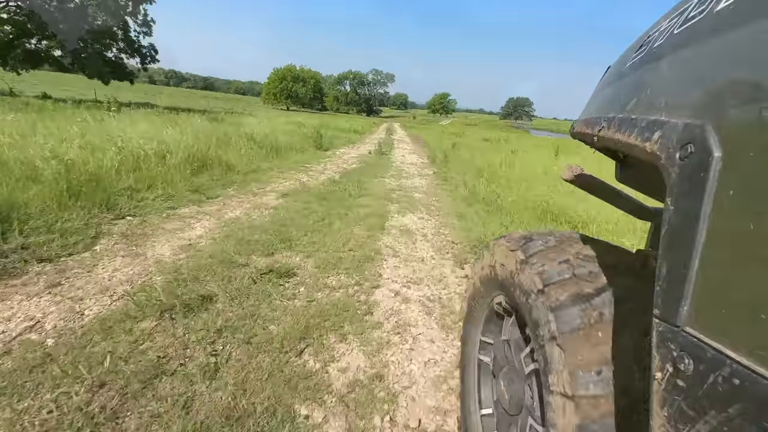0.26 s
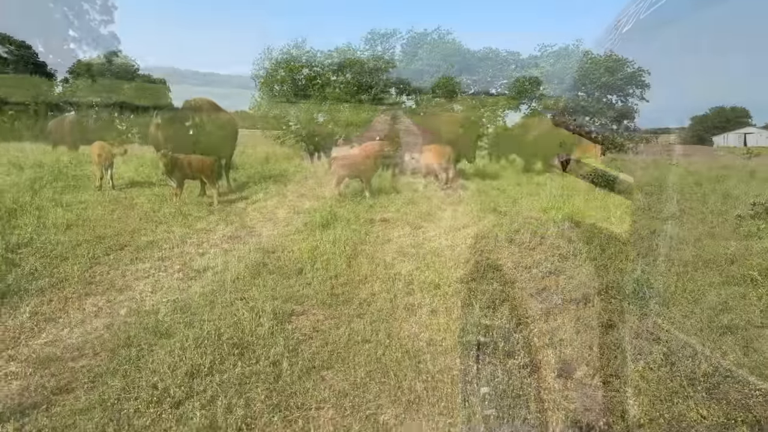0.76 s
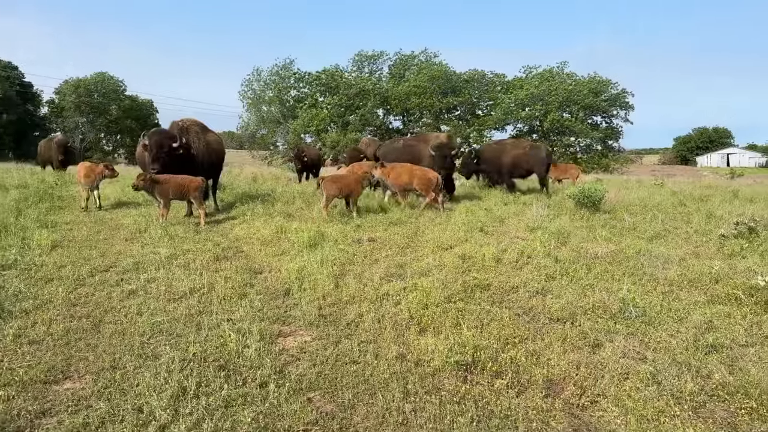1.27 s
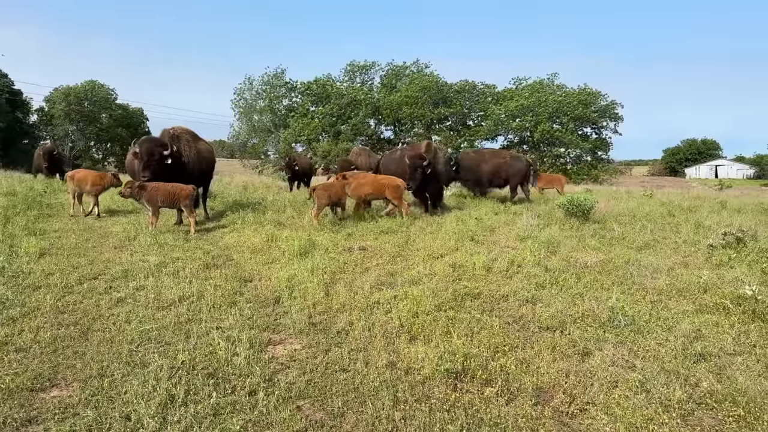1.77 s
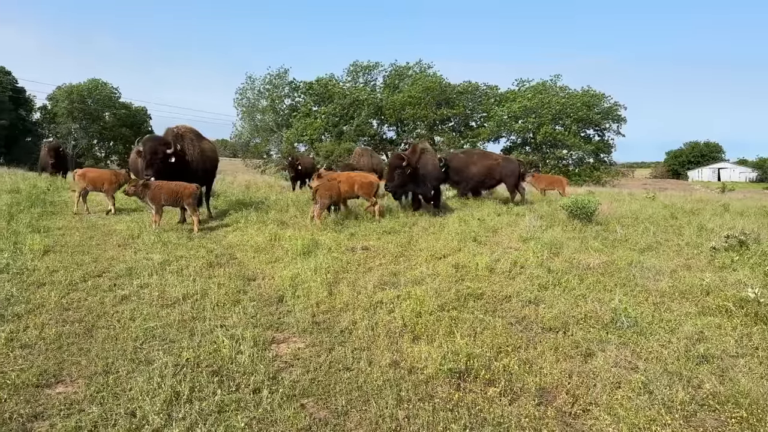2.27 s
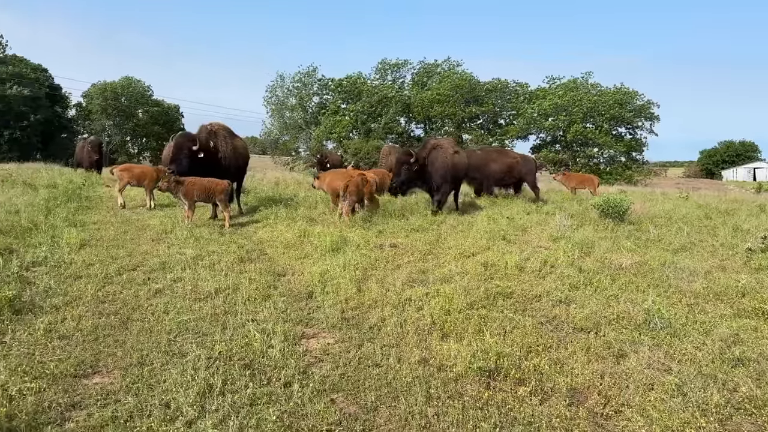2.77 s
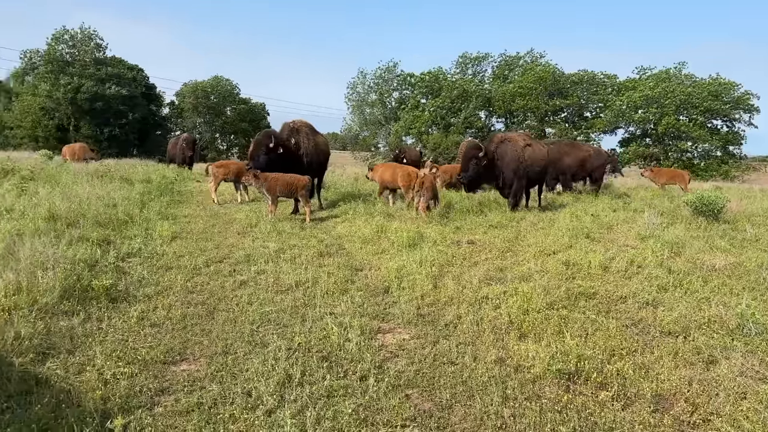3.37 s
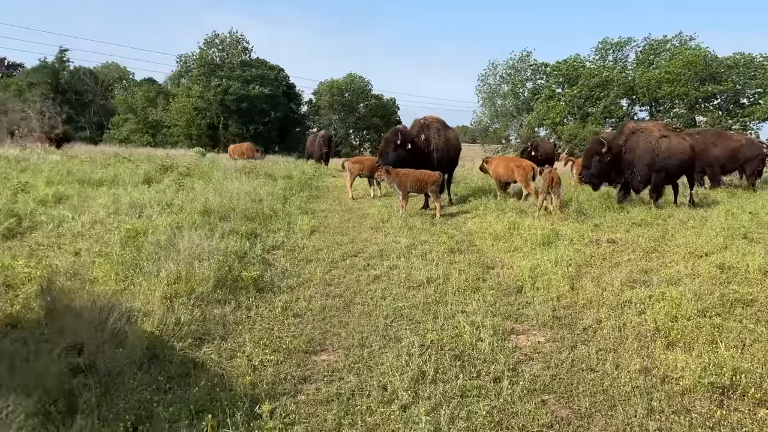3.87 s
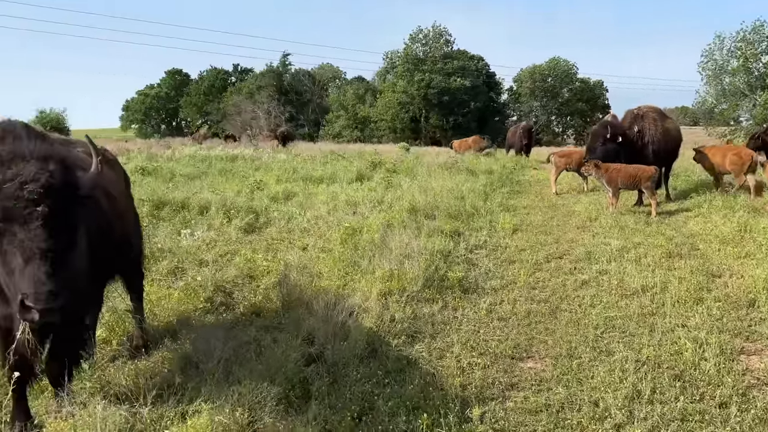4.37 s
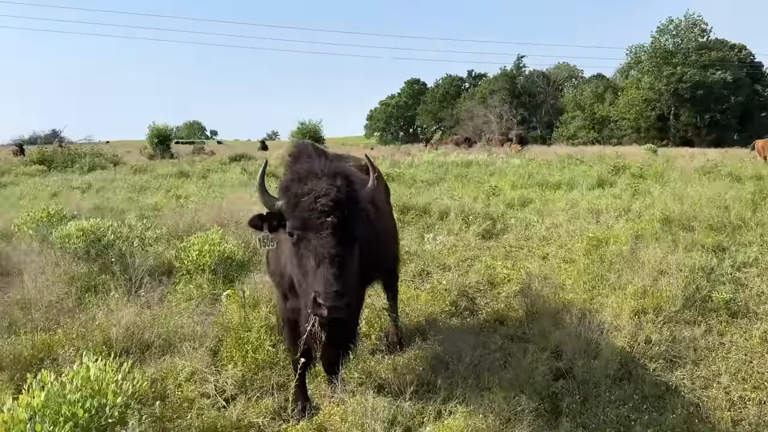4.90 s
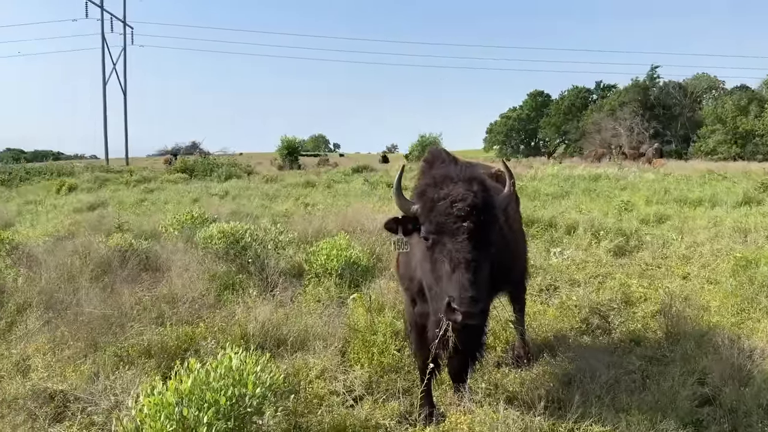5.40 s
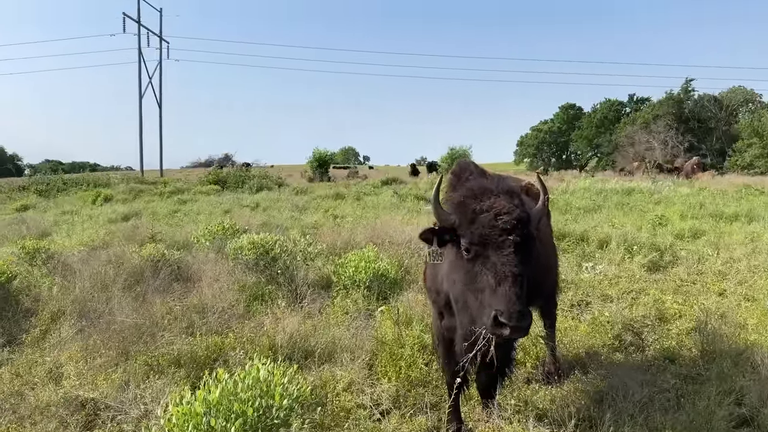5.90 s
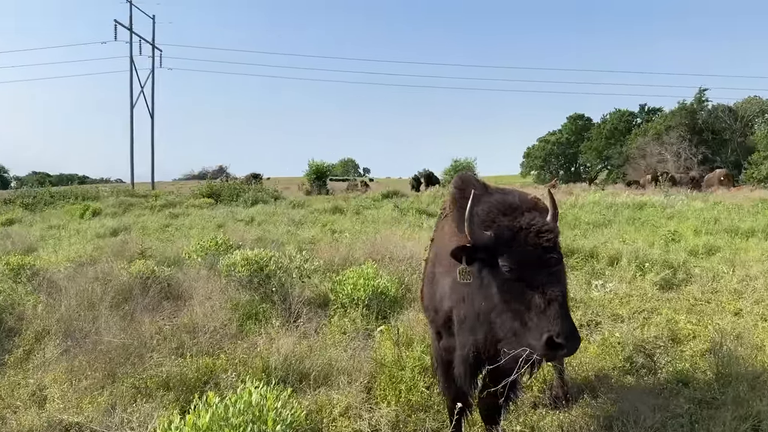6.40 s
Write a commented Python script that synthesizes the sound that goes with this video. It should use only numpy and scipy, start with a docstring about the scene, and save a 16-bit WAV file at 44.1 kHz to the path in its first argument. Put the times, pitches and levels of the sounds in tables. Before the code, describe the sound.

Engine hum, tyre noise and short high squeaks from an off-road vehicle open the scene and die away within about a second. In the calm open field that follows, bison grunt nearby in deep, rattling bursts while grass rustles and tears softly. Uneven wind buffets the microphone over faint crickets. Toward the end a far bird sings gliding notes and one last soft, breathy grunt sounds.

```python
"""A small off-road vehicle rolls along a dirt track: the engine drones, the tyres roar and rubber in
the suspension squeaks. After about a second it has faded, leaving a quiet pasture. Large grazing
animals grunt as their slack vocal folds slap shut, and they tear grass with a crackle. Wind buffets
the microphones and crickets trill with their wings. Mostly near the end, a distant bird whistles."""
import sys
import numpy as np
from scipy import signal
from scipy.fft import next_fast_len
from scipy.io import wavfile
from scipy.ndimage import uniform_filter1d

SR = 44100
rng = np.random.default_rng(int(sys.argv[2]) if len(sys.argv) > 2 else 0)


def pcm_store(signal):
    """Save signal as 16-bit PCM."""
    levels = np.round(np.clip(np.atleast_2d(signal), -1, 1) * 32767)
    wavfile.write(sys.argv[1], SR, levels.astype(np.int16).T)


N = 293265

# spectrum of wind on the microphones: f/Hz, level/dB
WIND_SPECTRUM = [(12, -45), (20, -26), (43, -1.5), (66, 2.5), (168, -13), (248, -20), (284, -33),
                 (500, -34), (650, -19), (1100, -120)]
# how alike left and right are in the open air: f/Hz, likeness (1 same, -1 opposite)
AIR_LIKENESS = [(60, 0.94), (180, 0.88), (550, -0.34), (1650, -0.088), (4970, -0.29), (15000, -0.5)]


def amp(db):
    """Turn decibels into a gain."""
    return 10 ** (np.asarray(db) / 20)


def rms_one(x):
    """Scale a signal to an average (rms) strength of 1."""
    return x / np.sqrt(np.mean(x ** 2) + 1e-20)


def at_hz(points, hz):
    """Read a curve at one frequency, on an axis of octaves."""
    freqs, values = np.transpose(points)
    return np.interp(np.log(hz), np.log(freqs), values)


def three_points(times, values):
    """An event's own clock, and a line through its values at start, turn and end."""
    t = np.arange(0, times[2] - times[0], 1 / SR)
    return t, np.interp(t + times[0], times, values)


def drift(rate, size=N):
    """A random wander of about 1 either way; a higher rate (Hz) wanders faster."""
    r = np.exp(-80 * np.pi * rate / SR)
    slow = signal.lfilter([1], [1, -2 * r, r * r], rng.standard_normal(N // 40 + 2002))[2000:]
    return np.interp(np.arange(size) / 40, np.arange(len(slow)), rms_one(slow))


def resonate(x, hz, width):
    """Let a signal ring at one frequency; a narrower width (Hz) rings longer."""
    r = np.exp(-np.pi * width / SR)
    feedback = [1, -2 * r * np.cos(2 * np.pi * hz / SR), r * r]
    return signal.lfilter(np.array([1, 0, -1]) * (1 - r * r) / 2, feedback, x)


def ring(x, hz, width):
    """Resonate twice for a steeper peak."""
    return resonate(resonate(x, hz, width), hz, width)


def body(x, modes):
    """A hollow body rings at several resonances (modes), added with alternating signs."""
    return sum((-1) ** k * amp(db) * ring(x, hz, width) for k, (hz, width, db) in enumerate(modes))


def pan(db):
    """Left and right gains; positive dB leans left."""
    return amp(np.array([[.5], [-.5]]) * db)


def add(out, start_s, x, pan_db=0):
    """Mix a mono sound into the stereo track."""
    start = round(start_s * SR)
    x = x[:N - start]
    out[:, start:start + len(x)] += x * pan(pan_db)


def banded_noise(spectrum, likeness, flicker_db, rate, balance=((1, 0), (2, 0)), size=N):
    """Stereo noise of strength 1, built from half-octave bands that flicker in level."""
    out, together = 0, drift(rate / 4, size)
    edges = np.r_[20 * 2 ** np.arange(0, 9.5, .5), 12200, 16500]
    white = rng.standard_normal((2, 2, size))
    for k, (low, high) in enumerate(zip(edges, edges[1:])):
        hz = np.sqrt(low * high)
        if at_hz(spectrum, hz) < -70:
            continue
        band = signal.butter(2, [low, high], "band", fs=SR, output="sos")
        mid, side = signal.sosfilt(band, white[k % 2])
        alike = np.clip(at_hz(likeness, hz), -1, 1)
        stereo = np.sqrt(1 + alike) * mid + np.sqrt(1 - alike) * side * [[1], [-1]]
        gain = amp(at_hz(spectrum, hz) + flicker_db * (0.45 * together + drift(rate, size)))
        out = out + gain * pan(at_hz(balance, hz)) * stereo
    return rms_one(out)


def pasture_air():
    """Far traffic, leaves and air blend into a faint wash."""
    # spectrum of the wash: f/Hz, level/dB
    spectrum = [(88, -30), (150, -7), (263, 2.5), (396, -0.5), (681, 1), (894, 2), (1870, -15), (2700, -5),
                (3410, -29), (5230, -13.5), (5870, -23), (9360, -23), (15500, -118.5)]
    return amp(-57.5) * banded_noise(spectrum, AIR_LIKENESS, flicker_db=1.3, rate=9.3)


def crickets():
    """Fast strokes ring a cricket's wing in trills, blurred by the grass; many more sing far off."""
    # trills: start t/s, level/dB
    trills = [(1.1, -79), (1.5, -68.5), (2.028, -66.5), (2.6, -68), (3.17, -64.5), (3.62, -63.5),
              (4.24, -63.5), (4.702, -67.5), (5.18, -64), (5.72, -63), (6.163, -66)]
    wing_hz, strokes_per_s, left_lead_rad = 5190, 78, 2.41
    pause_s, edge_s, last_end_s = 0.13, 0.016, 6.544
    t = np.arange(N) / SR
    cycle = np.cumsum(strokes_per_s * (1 + 0.0483 * drift(2.63))) / SR
    strokes = 1 + .5 * np.sin(2 * np.pi * cycle)
    wing = ring(rng.standard_normal(N), wing_hz, 370)
    wing = rms_one(wing * strokes * amp(2.0 * drift(25)))
    phase_shift = np.exp(.5j * left_lead_rad * np.array([[1], [-1]]))
    wing = np.real(signal.hilbert(wing, next_fast_len(N))[:N] * phase_shift)
    out = amp(-71.5) * rms_one(ring(rng.standard_normal((2, N)), hz=4840, width=700))   # far chorus
    ends = [start - pause_s for start, _ in trills[1:]] + [last_end_s]
    for (start, db), end in zip(trills, ends):
        out += amp(db) * np.clip(np.minimum(t - start, end - t) / edge_s, 0, 1) * wing
    return out


def bird():
    """Gliding whistles from afar waver in the air and echo off the trees."""
    # notes: start, turn and end t/s; start, turn and end f/Hz; level/dB
    notes = [(2.56, 2.598, 2.65, 2390, 2740, 3120, -69.5), (4.842, 4.9, 4.99, 2900, 2910, 2810, -66),
             (5.296, 5.34, 5.41, 2570, 3090, 2270, -60.5), (5.555, 5.573, 5.605, 3220, 2980, 3320, -60),
             (5.589, 5.66, 5.765, 3140, 2565, 2660, -59.5), (5.811, 5.845, 5.945, 2350, 2940, 1880, -65),
             (5.918, 5.96, 6.0, 2690, 2640, 2660, -70.5), (6.25, 6.276, 6.31, 2920, 2820, 2770, -61.5),
             (6.3, 6.33, 6.36, 2730, 2950, 3200, -71), (6.34, 6.375, 6.42, 3210, 3280, 3320, -64),
             (6.506, 6.554, 6.645, 3100, 2930, 2390, -70)]
    attack_s, release_s, sag_db_per_s = 0.025, 0.022, 16
    echo_db, echo_s = -5, .7
    out = np.zeros((2, N))
    waver = amp(2 * drift(40) + 3 * drift(150))
    for *times, hz0, hz1, hz2, db in notes:
        t, hz = three_points(times, [hz0, hz1, hz2])
        hz = uniform_filter1d(hz, size=900)   # round off the turn
        whistle = np.sin(2 * np.pi * np.cumsum(hz) / SR)
        shape = np.clip(np.minimum(t / attack_s, (t[-1] - t) / release_s), 0, 1)
        add(out, times[0], amp(db - sag_db_per_s * t) * shape * whistle, pan_db=1)
    out *= waver
    out[1] = np.roll(out[1], 3)   # reaches the right side later
    t = np.arange(0, echo_s, 1 / SR)
    echoes = rng.standard_normal((2, len(t))) * amp(-60 * t / echo_s)
    echoes *= amp(echo_db) / np.sqrt(np.sum(echoes ** 2) / 2)
    return out + signal.fftconvolve(out, echoes, axes=1)[:, :N]


def grass_rustle():
    """The grass hisses steadily and swells as bodies brush through it."""
    # swells: middle t/s, level/dB, half length/s
    rustles = [(1.324, -66, 0.27), (1.893, -67.5, 0.11), (2.27, -68, 0.19), (2.84, -69.5, 0.23),
               (3.78, -70, 0.088), (4.246, -64, 0.029), (4.418, -64.5, 0.38), (4.723, -57, 0.086),
               (5.242, -64, 0.053), (5.932, -69.5, 0.065), (6.538, -67.5, 0.11)]
    # spectrum of the hiss: f/Hz, level/dB
    spectrum = [(1500, -90), (1760, -51.5), (3000, 3.5), (4260, 2), (6530, 1), (8250, 2.5), (9470, 2),
                (11200, -33), (14000, -4)]
    t = np.arange(N) / SR
    gain = amp(-78.5) + sum(amp(db) * np.exp(-((t - s) / half) ** 2) for s, db, half in rustles)
    return gain * banded_noise(spectrum, [(3000, .3), (15000, 0.27)], flicker_db=1.2, rate=4.8)


def wind_rumble():
    """Gusts make a lumpy rumble at the microphones."""
    # strength of the wind: t/s, level/dB
    gusts = [(.8, -37), (1.4, -39), (1.65, -45), (2.0, -30.5), (2.3, -43), (2.65, -42.5), (2.95, -34.5),
             (3.55, -46), (3.75, -35.5), (4.05, -40), (4.65, -34), (4.9, -49.5), (5.0, -46), (5.4, -54),
             (5.9, -53.5), (6.22, -47), (6.4, -38), (6.55, -45.5)]
    db = np.interp(np.arange(N) / SR, *np.transpose(gusts))
    return amp(db) * banded_noise(WIND_SPECTRUM, AIR_LIKENESS, flicker_db=2.5, rate=37)


def wind_buffets():
    """Single swirls of air thump the microphones; each slows as it passes, so its pitch drops."""
    # thumps: t/s, level/dB, starting f/Hz
    buffets = [(0.434, -15.5, 63), (0.475, -21, 90), (0.499, -23, 150), (0.519, -18.5, 244),
               (1.556, -27.5, 65.6), (2.198, -22.5, 66.5), (2.392, -29.5, 55.5), (2.903, -26, 70),
               (3.007, -23, 71), (3.149, -24.5, 61), (3.646, -26, 66), (3.757, -25, 57),
               (3.889, -27.5, 113), (3.919, -20.5, 67), (4.163, -25.5, 64), (4.684, -18, 120)]
    cycles, slowing = 1.91, 0.14
    out = np.zeros((2, N))
    for start, db, hz in buffets:
        progress = np.arange(0, 1, hz / cycles / SR)
        thump = np.sin(2 * np.pi * cycles * progress * (1 - slowing * progress))
        add(out, start, amp(db) * np.hanning(len(thump)) * thump, pan_db=rng.normal(0, 5))
    return out


def grass_tears():
    """Torn or trodden grass gives a burst of dense crackle."""
    # bursts: t/s, level/dB, centre f/Hz, length/s
    tears = [(1.26, -63, 2050, 0.049), (2.302, -58.5, 1720, 0.042), (2.319, -60, 1530, 0.03),
             (2.691, -59, 1540, 0.038), (2.717, -59, 2110, 0.021), (3.037, -49.5, 1610, 0.031),
             (3.316, -54, 3320, 0.028), (3.372, -57, 1880, 0.041), (4.139, -63.5, 3700, 0.08),
             (4.2, -61, 4000, 0.035), (4.657, -64, 6600, 0.091), (5.222, -60.5, 900, 0.055)]
    out = np.zeros((2, N))
    for start, db, hz, length in tears:
        t = np.arange(0, 3 * length, 1 / SR)
        snaps = rng.standard_normal(len(t)) * amp(7.0 * rng.standard_normal(len(t)))
        crackle = resonate(snaps, hz, 0.5 * hz) + 0.15 * ring(snaps, 3320, 3800)
        shape = np.tanh(t / 0.003) * np.exp(-(t / length) ** 2)
        add(out, start, amp(db) * shape * rms_one(crackle))
    return out


def ticks():
    """Stones and stalks each give one short knock."""
    # knocks: t/s, level/dB, f/Hz, left minus right/dB, decay/s
    knocks = [(0.286, -27, 9200, -3, 0.0086), (2.33, -44, 400, -6, 0.0099), (4.213, -44, 9500, 0, .0012),
              (4.42, -57, 8000, 0, .001), (4.557, -47, 9000, 0, 0.0021), (5.165, -48, 895, -2, 0.0055),
              (5.838, -47, 580, -11, .004), (6.348, -46.5, 1040, -8, 0.0047)]
    out, t = np.zeros((2, N)), np.arange(0, .03, 1 / SR)
    for start, db, hz, pan_db, decay in knocks:
        knock = ring(rng.standard_normal(len(t)) * np.exp(-t / decay), hz, width=hz)
        add(out, start, amp(db) * knock / np.abs(knock).max(), pan_db)
    return out


def soften(clicks, hz):
    """A fleshy contact is no sharp click: it lasts 0.6 of the cycle that it rings."""
    touch = np.hanning(round(.6 * SR / hz))
    return signal.fftconvolve(clicks, touch / touch.sum())[:len(clicks)]


def grunts():
    """Slack vocal folds slap shut; each slap and its puff of air rings the throat, raspier with effort."""
    # grunts: start, peak and end t/s; peak level/dB; swell/dB; slaps per second at start, peak and end
    calls = [(0.792, 0.951, 1.05, -39.5, -3, 36.2, 33.2, 30.7), (1.10, 1.21, 1.3, -42.5, 0, 49, 53, 49),
             (1.25, 1.359, 1.48, -31, 7.5, 42.7, 45.3, 36), (1.701, 1.892, 1.945, -30.5, 7.5, 36.5, 53, 52),
             (1.903, 1.962, 2.14, -32, 1.5, 30.8, 31.5, 31), (2.69, 2.83, 3.01, -37, 10, 57.4, 54.5, 51.3),
             (4.252, 4.272, 4.278, -37.5, 4, 24.6, 18, 24), (4.333, 4.429, 4.545, -39, 3, 36, 46, 39),
             (4.553, 4.658, 4.7, -40, 1, 43, 43, 40), (4.596, 4.596, 4.615, -27.5, 6, 107, 114, 98),
             (4.562, 4.702, 4.82, -48, 4, 54, 63.6, 48), (6.184, 6.38, 6.63, -47, 18, 26.8, 28, 25.5)]
    # voice of each grunt: throat number, unevenness (share of the gap between slaps), breath level/dB
    voices = [(0, .08, 6), (1, .03, -10), (2, .04, 6), (3, .012, -3), (4, .015, -4), (5, .012, -12),
              (6, .08, 11), (6, .04, 7), (6, .08, 11), (8, .05, 4), (7, .04, 6), (9, .1, 6)]
    # resonances of each throat: f/Hz, width/Hz, level/dB
    throats = [
        [(208, 160, 1), (340, 160, 0)],
        [(158, 58, 2), (292, 340, -18)],
        [(92, 45, 12), (349, 138, -7.5), (840, 520, -38), (1900, 310, -34.5), (2502, 450, -38.5),
         (3440, 330, -35.5)],
        [(184.7, 47, 12), (390, 236, -8), (602, 99, -36), (960, 140, -20.5), (1108, 98, -17),
         (1415, 160, -28.5), (2150, 740, -39)],
        [(183, 106, 7.5), (323, 110, 2.5), (525, 350, -23)],
        [(163.6, 35, 7), (328, 250, -11.5), (920, 200, -23), (1980, 290, -35), (2370, 170, -31.5),
         (3370, 200, -39)],
        [(195, 160, 8.5), (356, 210, 1), (630, 150, -13), (1060, 400, -22.5), (1560, 360, -24),
         (2000, 300, -24.5)],
        [(230, 120, 3), (470, 420, -2.5), (1040, 500, -12), (2020, 120, -10), (2470, 240, -8)],
        [(255, 200, 10.5), (483, 270, -0.5), (830, 350, -25)],
        [(142, 115, -2), (297, 69, -6), (940, 350, -25)],
    ]
    rasp_from_hz, scatter_db, max_slaps = 1300, 1.3, 40
    tail = (0, SR // 8)   # room for the throat to ring out
    out = np.zeros((2, N))
    for (*times, peak_db, swell_db, r0, r1, r2), (caller, rough, breath_db) in zip(calls, voices):
        t, rate = three_points(times, [r0, r1, r2])
        _, off_peak = three_points(times, [1, 0, 1])
        db = peak_db - swell_db * off_peak ** 2.5
        cycle = np.cumsum(rate) / SR
        at = np.flatnonzero(np.diff(np.floor(cycle), prepend=-1))   # a slap starts each cycle
        timing, force = rng.standard_normal((max_slaps, 2))[:len(at)].T
        at = np.clip(at + (rough * timing * SR / rate[at]).astype(int), 0, len(t) - 1)
        clicks, slaps = np.zeros((2, len(t)))
        clicks[at] = 1
        slaps[at] = amp(db[at] + 9.3 * rough * force)
        edges = np.clip(np.minimum(t, t[-1] - t) / 0.0011, 0, 1)
        puffs = rng.standard_normal(SR)[:len(t)] * np.exp(-4 * (cycle % 1))
        puffs *= amp(db) * edges * np.sqrt(rate / SR)
        pulses = np.pad(slaps + amp(breath_db) * puffs, tail)
        rasp = amp(db - 3) * clicks + amp(7) * puffs
        rasp = np.pad(rasp * amp(.8 * (db - peak_db)), tail)   # falls faster away from the peak
        slap_number = np.minimum(np.pad(cycle, tail, "edge").astype(int), max_slaps - 1)
        voice = 0
        for k, (hz, width, mode_db) in enumerate(throats[caller]):
            drive = soften(pulses, hz) if hz < rasp_from_hz else rasp
            scatter = amp(scatter_db * rng.standard_normal(max_slaps)[slap_number])
            voice += (-1) ** k * amp(mode_db) * ring(drive * scatter + 1e-18, hz, width)
        voice /= np.sqrt(np.mean(body(clicks, throats[caller]) ** 2))   # cancel the throat's own gain
        voice[350:] += 0.27 * voice[:-350]   # bounce off the ground
        add(out, times[0], voice)
    return out


def engine_hum(firings):
    """The engine drones at whole multiples of its firing rate; firings is their running count."""
    # tones: multiple of the firing rate, level/dB
    tones = [(1, -12), (2, 1), (4, 0), (6, -7), (8, -10), (9, -11), (15, -14), (27, -13), (28, -12),
             (30, -11)]
    stereo_phase = np.array([[1], [1.4]])
    return sum(amp(db + drift(4, len(firings))) * np.sin(k * (2 * np.pi * firings + stereo_phase))
               for k, db in tones)


def exhaust(firings):
    """Each firing sends a pulse of uneven strength ringing through the pipe."""
    # resonances of the pipe: f/Hz, width/Hz, level/dB
    pipe = [(360, 51, -8.5), (608, 75, -11.5), (760, 150, -8), (1105, 140, -9), (1488, 77, -3.5),
            (1646, 38, -0.5)]
    pulses = np.diff(np.floor(firings), prepend=0) * amp(rng.normal(0, 1.4, len(firings)))
    return rms_one(body(pulses, pipe))


def tyre_roar(size):
    """Tyres roar on dirt; sound bouncing between fender and tyre cuts evenly spaced notches in it."""
    # spectrum of tyre and body noise: f/Hz, level/dB
    spectrum = [(18, -36), (30, -6.5), (75, -8), (123, -4), (160, -6.5), (359, -12), (561, -16.5),
                (1510, -14.5), (2150, -19.5), (3050, -23.5), (4300, -29), (6100, -30.5), (8600, -39.5),
                (11200, -50), (14000, -54.5)]
    # how alike the two sides are: f/Hz, likeness
    likeness = [(60, 0.22), (180, 1), (550, 0.21), (1650, 0.65), (4970, 0.2), (15000, 0.21)]
    # lean to one side: f/Hz, left minus right/dB
    balance = [(60, -10.5), (180, 4), (550, -4), (1650, 2.5), (4970, 12), (15000, -7)]
    bounce_s = .000385
    roar = banded_noise(spectrum, likeness, flicker_db=2.2, rate=45, balance=balance, size=size)
    gap = np.zeros(round(bounce_s * SR) - 1)
    roar = signal.lfilter(np.r_[1, gap, -.75], np.r_[1, gap, -.45], roar)
    return roar - 0.49 * resonate(roar, hz=1780, width=280)   # a hollow in the roar


def headwind(t):
    """Air rushes over the microphones, then quickly dies away."""
    drops_at_s, drop_db_per_s = 0.46, 150
    gain = amp(-28 - drop_db_per_s * np.maximum(t - drops_at_s, 0))
    return gain * banded_noise(WIND_SPECTRUM, [(30, .1), (300, -.3)], flicker_db=3.5, rate=20, size=len(t))


def suspension_squeaks():
    """Slipping rubber squeaks: a narrow band of noise, with another an octave up."""
    # squeaks: t/s, level/dB, f/Hz, octave above the main tone/dB, length/s
    squeaks = [(.0, -32, 3280, -20, 0.019), (0.01, -53, 3870, 17, 0.063), (0.118, -26, 3196, -11, 0.025),
               (0.419, -45, 3220, 14.5, 0.029), (0.453, -32, 3200, -6, 0.042),
               (0.699, -54.5, 3190, 13, 0.04), (0.753, -36, 3260, -12, 0.029),
               (0.776, -38.5, 3250, -23, 0.056), (1.003, -44.5, 3240, -31, 0.043)]
    out = np.zeros((2, N))
    for start, db, hz, octave_db, length in squeaks:
        size = round(length * SR)
        slip = rng.standard_normal((2, size + 400))
        tone = rms_one(ring(slip[0], hz, 110)[400:])
        octave = rms_one(ring(slip[1], 2 * hz, 340)[400:])
        add(out, start, amp(db) * np.hanning(size) * (tone + amp(octave_db) * octave), pan_db=8)
    return out


def vehicle():
    """Engine, exhaust and tyres fade out together; an opening jolt lifts the hum and the headwind."""
    firings_per_s, fade_from_s, fade_to_s = 39.8, 0.43, 1.184
    jolt_db, jolt_s = 10, .025
    size = round(1.3 * SR)
    t = np.arange(size) / SR
    fade = np.clip((fade_to_s - t) / (fade_to_s - fade_from_s), 0, 1) ** 1.46
    jolt = amp(jolt_db * np.exp(-t / jolt_s))
    firings = np.cumsum(firings_per_s * (1 + 0.0036 * drift(6, size))) / SR
    hum = amp(-28) * jolt * pan(3) * engine_hum(firings)
    rolling = hum + amp(-32) * exhaust(firings) + amp(-22.5) * tyre_roar(size)
    out = np.zeros((2, N))
    out[:, :size] = fade * rolling + jolt * headwind(t)
    return out


def scene():
    """The vehicle, the grazing animals, the wind and the pasture around them."""
    ride = vehicle() + suspension_squeaks()
    grazing = grunts() + grass_tears() + ticks()
    breeze = wind_rumble() + grass_rustle() + wind_buffets()
    return ride + grazing + breeze + crickets() + bird() + pasture_air()


def record(dry):
    """The microphones miss the deepest bass and the highest treble."""
    thin = signal.sosfilt(signal.butter(2, 38, "high", fs=SR, output="sos"), dry)
    return signal.sosfilt(signal.cheby2(24, 70, 15850, fs=SR, output="sos"), thin)


dry = scene()
out = record(dry)
pcm_store(out)
```